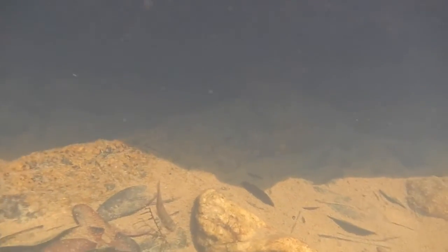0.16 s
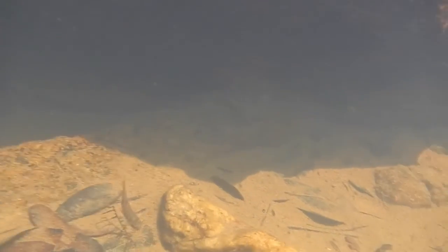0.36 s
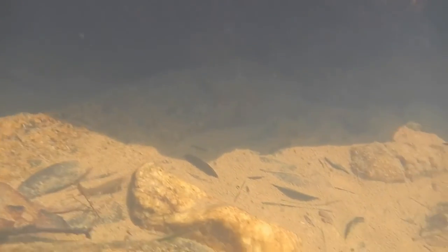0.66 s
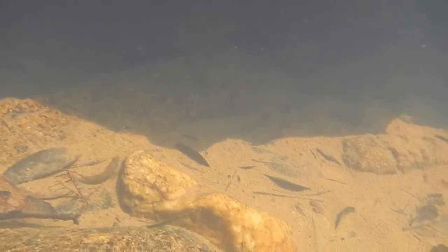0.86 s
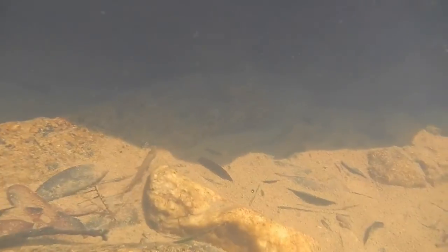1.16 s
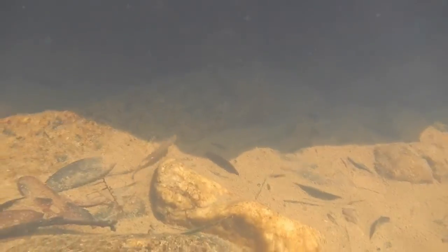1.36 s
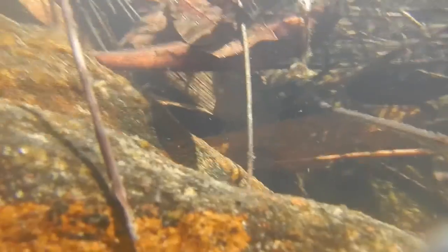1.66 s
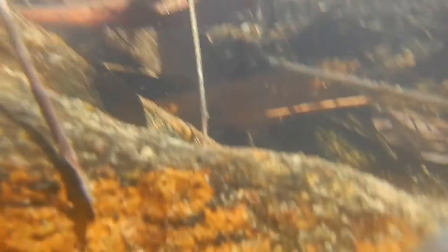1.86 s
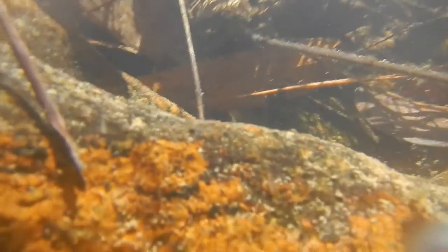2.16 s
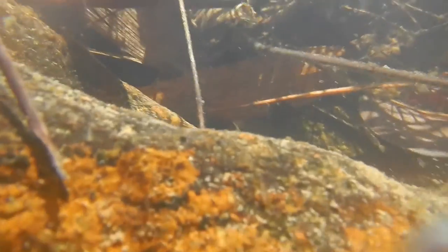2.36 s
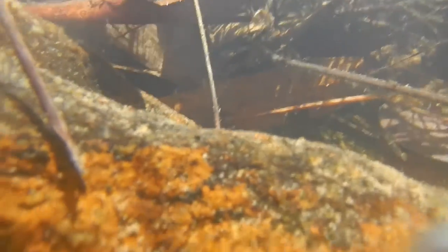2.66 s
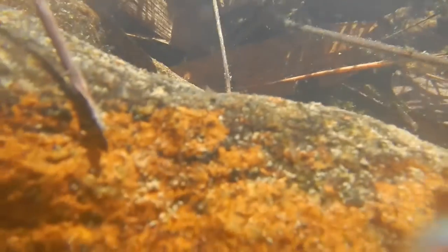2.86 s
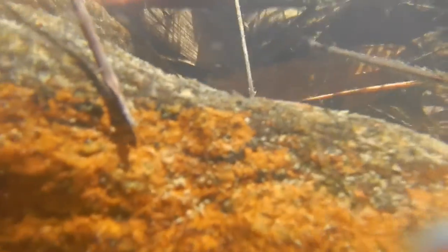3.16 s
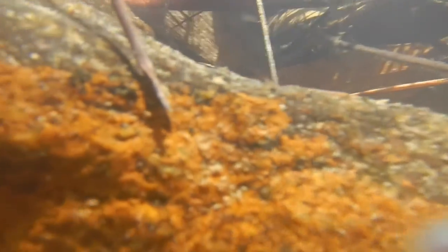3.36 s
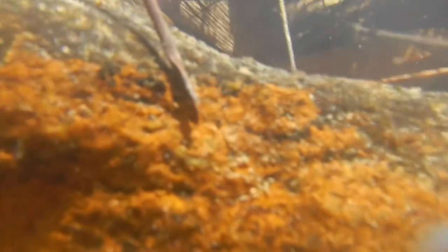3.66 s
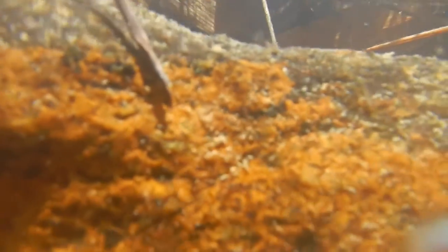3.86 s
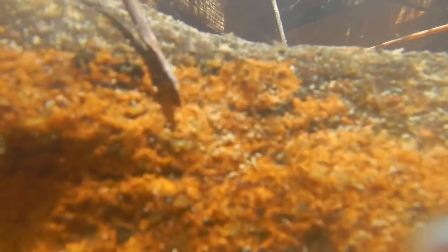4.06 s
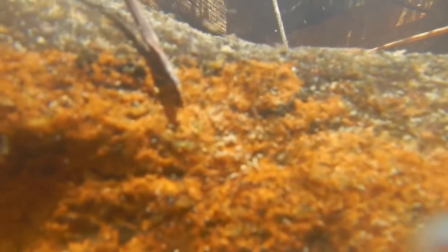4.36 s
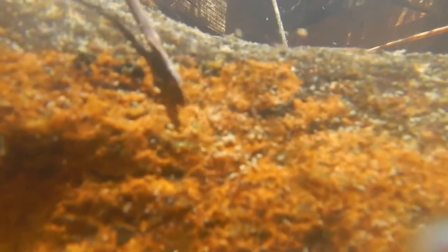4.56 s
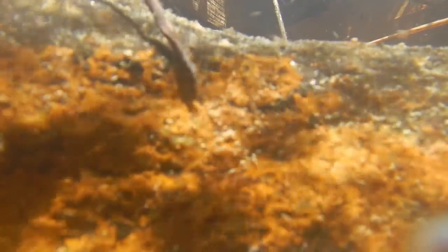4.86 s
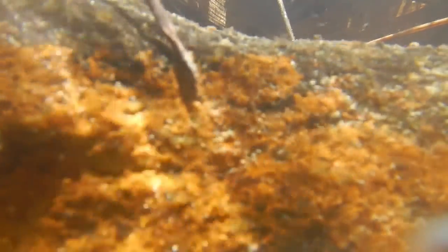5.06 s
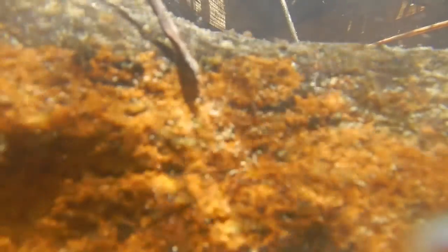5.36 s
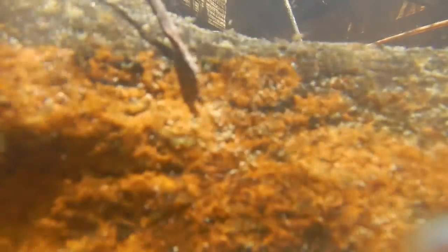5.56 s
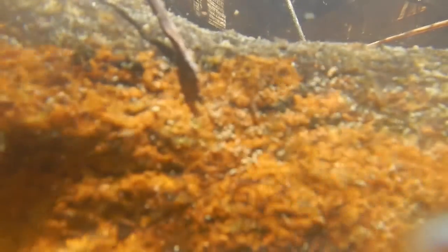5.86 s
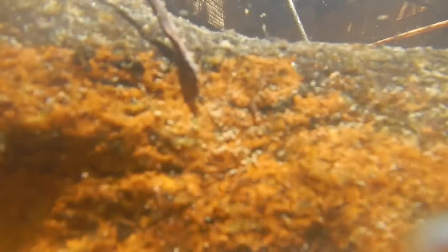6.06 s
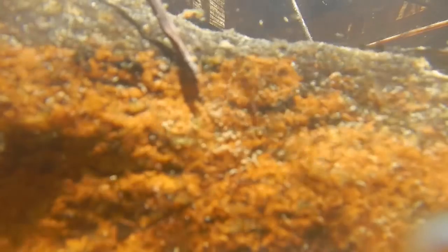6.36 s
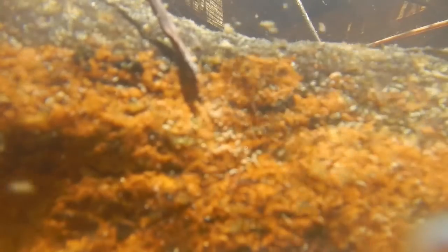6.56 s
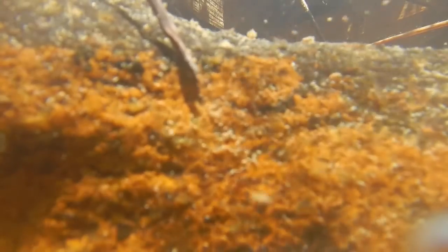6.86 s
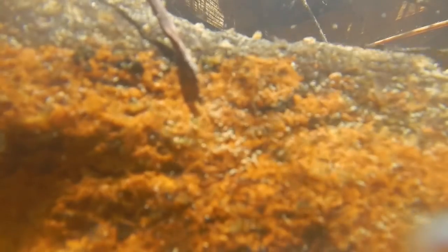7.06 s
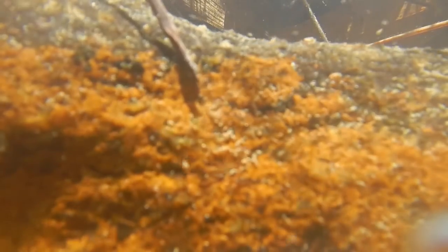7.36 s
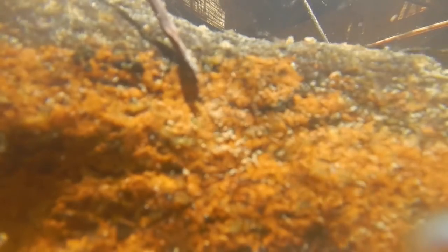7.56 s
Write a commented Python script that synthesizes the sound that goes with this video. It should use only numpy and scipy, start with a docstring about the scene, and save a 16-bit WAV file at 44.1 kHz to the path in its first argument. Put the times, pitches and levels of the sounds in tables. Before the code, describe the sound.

A small sealed microphone sits underwater in a stony stream. From 0 to 1.7 s, muffled water gurgles with low eddies, a thin wash and irregular hollow bumps, strongest near 0.15, 1.2, 1.4 and 1.6 s; faint, short high pips hide beneath. At about 1.7 s everything cuts out for less than a tenth of a second. Then rounded gulps and thumps crowd in until about 2.1 s, continue more loosely, and cluster again from 2.6 to 2.9 s, with dull scratches. The flow dips after the heavy bumps and recovers. At 3.9 to 4.0 s one hard, hollow, rattling knock on stone overloads the sound. The water drops nearly away, then gradually returns over two seconds as muffled, steady bubbling flow with faint hiss and a very thin high whine. A few weak bumps and, after 5.7 s, tiny bubble snaps remain until 7.7 s.

```python
"""Stony-stream water churns and gurgles around a small sealed camera: coloured noise plus ringing air pockets.
Bumps (gliding tones in low noise) and one rattling knock on a stone (case modes, thud) overload it. Flow,
knocks and electronics sag at listed times, then creep back; a muffled steady flow returns last. The flow
changes colour at a short silent dropout and again at the knock. Scratches, snapping tiny bubbles, faint hiss
and a thin whine lie on top."""
import sys
import numpy as np
from scipy import signal
from scipy.io import wavfile
from scipy.ndimage import uniform_filter1d

SR = 44100
rng = np.random.default_rng(int(sys.argv[2]) if len(sys.argv) > 2 else 0)


def persist_wave(psi):
    """Save psi, clipped to +-1, as 16-bit WAV."""
    counts = np.round(np.clip(psi, -1, 1) * 32767).astype(np.int16)
    wavfile.write(sys.argv[1], SR, np.atleast_2d(counts).T)


def boost_factor(decibels):
    """Convert a level in decibels to a linear amplitude factor."""
    exponent = np.asarray(decibels, float) / 20
    return 10 ** exponent


N = 340011


def evened(x):
    """Scales to rms 1."""
    return x / np.sqrt(np.mean(x ** 2) + 1e-20)


def read(points, hz):
    """Reads a spectrum on a log-frequency axis."""
    f, value = np.transpose(points)
    return np.interp(np.log(hz + 1), np.log(f + 1), value)


def curve(rows, column):
    """One column of a time table, interpolated to every sample."""
    rows = np.array(rows)
    return np.interp(np.arange(N) / SR, rows[:, 0], rows[:, column])


def add(mix, s, sound, pan_db):
    """Adds a sound at time s; pan_db is left minus right."""
    part = mix[:, round(s * SR):][:, :sound.shape[-1]]
    gains = boost_factor(np.array([[pan_db / 2], [-pan_db / 2]]))
    part += gains * sound[..., :part.shape[1]]


def ring(hz, t60_s, rise_s):
    """A sine with exponential decay and soft start, cut at 0.25 s."""
    t = np.arange(round(.25 * SR)) / SR
    decay = boost_factor(-60 * t / max(t60_s, .004))
    return np.sin(2 * np.pi * hz * t) * decay * (1 - np.exp(-t / rise_s))


# flow colour changes: t/s
CHANGES_S = (1.75, 3.95)
# left-right likeness of noise: f/Hz, likeness/1
LIKENESS = [(30, .1), (130, 0.43), (290, 0.77), (640, 0.74), (1400, 0.2), (3100, 0.7), (6800, .3),
            (15000, .3)]
# phase by which left leads: f/Hz, lead/rad
LEFT_LEAD = [(30, -0.5), (430, 0.25), (900, 0.47), (1500, 1.34), (2240, 2), (3400, 4.5), (13600, 4.5),
             (14600, 0)]
# noise balance: f/Hz, left minus right/dB
BALANCE = [(60, -5.5), (180, 1), (550, -9), (1650, 2), (4970, 2), (15000, -2.5)]


def noise(spectra, size, patchy_db, flicker_db):
    """Two partly alike noise channels, one colour a stretch, in drifting patches and shared flicker."""
    hop = size // 4
    frames, hz = 4 * N // size + 5, np.fft.rfftfreq(size, 1 / SR)
    a, b, c, d, patches = rng.standard_normal((frames, len(hz), 5)).T
    patches = uniform_filter1d(patches, size=4, axis=0)  # along frequency
    patches = evened(uniform_filter1d(patches, size=5, axis=1))  # along time
    flicker = evened(uniform_filter1d(rng.standard_normal(frames), size=3))

    same = np.clip(read(LIKENESS, hz), -1, 1)[:, None]
    left = a + 1j * b
    right = same * left + np.sqrt(1 - same ** 2) * (c + 1j * d)
    right = right * np.exp(-1j * read(LEFT_LEAD, hz))[:, None]

    spot = np.searchsorted(CHANGES_S, np.arange(frames) * hop / SR) % len(spectra)
    colours = np.transpose([evened(boost_factor(read(spectrum, hz))) for spectrum in spectra])
    lean_db = read(BALANCE, hz)[:, None] / 2
    level_db = patchy_db * patches + flicker_db * flicker + np.array([lean_db, -lean_db])
    z = np.array([left, right]) * colours[:, spot] * boost_factor(level_db)
    return evened(signal.istft(z, nperseg=size, noverlap=size - hop)[1][:, :N])


def bubbles(spectrum, per_s, spread_db, cycles, shared, top_hz):
    """Random air pockets at 16 pitches ring, losing 20 dB in the given cycles unless t60 is floored."""
    out = np.zeros((2, N))
    for k, hz in enumerate(np.geomspace(top_hz / 4.01, top_hz, num=16)):
        draw = rng.random((N, 2))
        strength_db = spread_db * np.minimum(-np.log(draw[:, 1] + 1e-9), 4)
        train = (draw[:, 0] < per_s / 16 / SR) * boost_factor(strength_db)
        pocket = ring(hz, 3 * cycles / hz, 1 / hz)[:4000]
        out[k % 2] += boost_factor(read(spectrum, hz)) * signal.oaconvolve(train, pocket)[:N]
    return evened(out + shared * out[::-1])  # other side hears a share


# flow colour, first and last stretch: f/Hz, relative density/dB
FLOW = [
    [(88, -49), (150, 3.5), (205, -33), (276, -10), (328, 6), (371, 15), (614, 4.5), (676, 19),
     (1200, -8.5), (1560, -34.5), (2640, -120)],
    [(88, -33.5), (150, -9), (306, -24), (412, -1), (498, -12.5), (593, 0.5), (625, 6.5), (1100, -24),
     (1200, -26), (1560, -53.5), (2640, -120)],
]
# flow colour between the changes: f/Hz, relative density/dB
RESTLESS_FLOW = [(88, -36), (150, -12), (231, -6.5), (367, -2.5), (441, -1.5), (728, 0.5), (900, -28),
                 (1050, -25), (1500, -36), (1950, -59), (3300, -120)]


def gurgle():
    """Turbulent flow as coloured noise plus many ringing air pockets; rms 1."""
    flow = noise([FLOW[0], RESTLESS_FLOW, FLOW[1]], size=1024, patchy_db=1.5, flicker_db=2.0)
    pockets = bubbles(FLOW[1], per_s=700, spread_db=1.4, cycles=5.46, shared=0.36, top_hz=964.8)
    return evened(flow + 0.78 * pockets)


# water jostling the case: t/s, thumps before low-pass re gurgle/dB
JOSTLE = [(0, -13.5), (1.7, -3), (1.8, -4), (2.9, -1.5), (3.4, 0.5), (3.9, -9.5), (4.3, -1.5), (5.5, -8.5),
          (6, -23.5), (7.71, -12)]


def thumps():
    """Water jostles the case: short-ringing pulses, low-passed to blunt thumps."""
    pulses = bubbles([(100, 0), (600, -1), (900, -8)], per_s=200, spread_db=3.6, cycles=1.4,
                     shared=.45, top_hz=850)
    low_pass = signal.butter(4, 950, fs=SR, output="sos")
    return boost_factor(curve(JOSTLE, 1)) * signal.sosfilt(low_pass, pulses)


# eddy colour: f/Hz, relative density/dB
RUMBLE = [(12, -40.5), (20, -12), (64, 6), (184, -2), (275, -3.5), (327, -8.5), (400, -13), (520, -37),
          (880, -120)]


def eddies():
    """Lumpy low eddies as slowly patchy low noise; rms 1."""
    return noise([RUMBLE], size=2048, patchy_db=3, flicker_db=1.0)


# wash colour, first and last stretch: f/Hz, relative density/dB
UPPER = [
    [(530, -41.5), (900, 2), (1040, -13.5), (1360, -2.5), (1500, -14.5), (1990, -16.5), (2340, -31),
     (2540, -22.5), (2640, -31), (4500, -43.5), (5850, -68), (9900, -120)],
    [(530, -41.5), (900, 6.5), (1110, -7.5), (1220, 6), (1330, -8), (1480, -3.5), (1600, -9), (1810, 1),
     (1970, -8), (2250, -16.5), (2760, -18), (3050, -22), (5000, -40), (6500, -61), (11000, -120)],
]
# wash colour between the changes: f/Hz, relative density/dB
RESTLESS_UPPER = [(530, -31.5), (900, -7), (1050, -4.5), (1100, -1.5), (1310, -8), (2370, -23), (2570, -25),
                  (2960, -33.5), (5000, -45.5), (6500, -79), (11000, -120)]


def wash():
    """Thin upper wash as patchy noise; rms 1."""
    return noise([UPPER[0], RESTLESS_UPPER, UPPER[1]], size=512, patchy_db=2.5, flicker_db=-0.5)


# faint short tones: t/s, length/s
PIPS = [(.093, 0.026), (.138, 0.063), (.238, 0.037), (.38, .025), (.48, .05), (.535, 0.049), (.655, 0.026),
        (.685, 0.02), (0.792, 0.042), (.835, 0.033), (.885, 0.036), (.965, 0.035), (1.203, 0.047),
        (1.275, .042), (1.455, 0.043), (2.13, 0.027), (2.253, 0.024), (2.319, 0.033), (2.69, 0.045),
        (3.17, .025), (3.293, .04), (3.36, .025), (3.577, 0.023)]
PIP_HZ, PIP_UNDER_FLOW_DB = 2500, 30.5  # tone peak under gurgle rms


def pips():
    """Faint steady sines a few hundredths of a second long, with tapered ends."""
    out = np.zeros((2, N))
    for s, length_s in PIPS:
        t = np.arange(round(length_s * SR)) / SR
        add(out, s, np.sin(2 * np.pi * PIP_HZ * t) * signal.windows.tukey(len(t), .4), 0)
    return boost_factor(-PIP_UNDER_FLOW_DB) * out


# stir before the sag: t/s, flow level/dB, eddies re flow/dB, upper wash re flow/dB
STIR = [(0, -22, 4, -13), (.35, -22, -5, -12.5), (.9, -27.5, -4, -9.5), (1.15, -25, 0, -13.5),
        (1.38, -27.5, -1.5, -9), (1.5, -21.5, -1.5, -12), (1.71, -24.5, 4.5, -9.5),
        (1.8, -15, -16.5, -13.5), (1.92, -9, -22, -18), (2.08, -15, -0.5, -18), (2.2, -13, -1.5, -18),
        (2.45, -18, -10.5, -18), (2.7, -13.5, -10, -16.5), (2.8, -22.5, -13, -13.5),
        (2.83, -10.5, -21.5, -13.5), (2.95, -9.5, -10, -20), (3.0, -17, -17, -17), (3.09, -11.5, -25, -11),
        (3.26, -22.5, -9, -15), (3.39, -15, -14, -15), (3.43, -12.5, -16, -7), (3.55, -13.5, -15, -15),
        (3.77, -16, -9, -14.5), (3.89, -11, -24.5, -17.5), (4.05, -12.5, -3.5, -16), (4.3, -22, -7, -19.5),
        (4.7, -22, -11, -16.5), (4.8, -24, -16, -13), (5.0, -22.5, -21, -14.5), (5.3, -24, -16, -14),
        (5.6, -23.5, -16, -14.5), (6.3, -26, -23.5, -13.5), (6.6, -28, -27.5, -12), (7.1, -27, -23, -14.5),
        (7.71, -30.5, -18.5, -7)]


def water():
    """Gurgle, thumps, eddies, wash and pips all follow one stir level."""
    low = boost_factor(curve(STIR, 2)) * eddies()
    high = boost_factor(curve(STIR, 3)) * wash()
    return boost_factor(curve(STIR, 1)) * (gurgle() + thumps() + low + high + pips())


def tick(db, edge_db):
    """A few-ms scratch: decaying noise, dull body peaking at db plus bright edge, partly unlike per side."""
    t = np.arange(600) / SR
    both, left, right = rng.standard_normal((3, 600)) * np.exp(-t / 0.0016)
    puff = both + 2.0 * np.array([left, right])
    body = signal.sosfilt(signal.butter(4, [800, 2400], "band", fs=SR, output="sos"), puff)
    edge = signal.sosfilt(signal.butter(2, [2400, 4500], "band", fs=SR, output="sos"), puff)
    return boost_factor(db) * (body / abs(body).max() + boost_factor(edge_db) * edge / abs(edge).max())


# gulps of air and bumps at the case: t/s, level/dB, f at crest/Hz, rise/s, left minus right/dB
GULPS = [(.02, -20, 930, 0.0016, -11.5), (.157, -6, 637, .003, -2), (.171, -9.5, 476, 0.0034, -14),
         (0.198, -14, 695, 0.004, 0), (.277, -18.5, 713, 0.0057, -3), (0.337, -18, 273, 0.0012, -5),
         (.411, -19.5, 683, 0.0027, -5), (.429, -17, 585, 0.0031, 0.5), (0.513, -28, 307, 0.0019, -6),
         (0.545, -11.5, 295, 0.0019, 0), (.917, -15.5, 670, 0.0044, -10), (.934, -12, 270, 0.0021, -5),
         (1.044, -18.5, 534, 0.0029, -19), (1.079, -15, 562, 0.0051, -11), (1.107, -13, 250, 0.0022, -11),
         (1.186, -12, 446, 0.0029, 8), (1.193, -5, 672, 0.0045, -5), (1.393, 0, 602, 0.0019, 7),
         (1.407, -9.5, 537, 0.0059, -5), (1.441, -14.5, 640, 0.0026, -9), (1.54, -16, 493, 0.0033, -12),
         (1.585, -1, 818, .002, -8), (1.812, -5.5, 179, 0.0015, -2.5), (1.816, -4.5, 605, 0.0027, -1.5),
         (1.847, -15.5, 572, 0.0034, -10.5), (1.856, -6, 546, 0.0057, -10.5), (1.863, -9, 602, 0.0047, 3),
         (1.876, -17.5, 527, 0.0045, -10), (1.895, -7.5, 517, 0.0013, -9), (1.913, -18.5, 570, .0036, 1),
         (1.956, -17.5, 490, 0.0016, -5), (1.976, -10, 601, 0.0043, -6), (2.118, -13.5, 662, 0.0019, 3.5),
         (2.164, -17, 449, 0.0044, -5.5), (2.193, -14.5, 277, .0042, 2), (2.242, -18, 635, 0.0039, -9),
         (2.334, -10.5, 663, 0.004, 5), (2.346, -10, 650, 0.0028, 5.5), (2.478, -9, 270, 0.0028, -1.5),
         (2.586, -2, 361, 0.0024, -1.5), (2.613, -8.5, 416, 0.0044, 6), (2.659, -25.5, 401, 0.013, 10),
         (2.702, -28.5, 315, 0.0027, 12), (2.717, -5.5, 384, 0.0051, -0.5),
         (2.822, -15.5, 507, 0.0036, 4.5), (2.845, -4, 588, 0.0025, -3.5), (2.869, -15, 770, 0.0051, -5.5),
         (2.888, -4, 494, 0.0007, -2), (2.894, -3, 253, 0.0036, 1.5), (2.923, -14.5, 239, 0.0032, -1),
         (2.969, -21.5, 477, 0.0037, -9.5), (3.077, -38.5, 580, 0.0056, 7), (3.177, -27.5, 392, 0.0023, 5),
         (4.044, -27.5, 656, 0.0048, -7), (4.064, -27.5, 482, 0.0019, -2), (4.11, -33, 700, 0.0042, -9),
         (4.133, -29, 562, 0.0018, -3.5), (4.546, -32.5, 562, 0.0025, -8.5),
         (5.413, -29.5, 730, 0.0023, -11), (5.485, -18, 238, 0.0037, 0), (5.504, -29.5, 121, 0.0072, -1),
         (5.86, -26.5, 109, 0.0081, 1), (6.394, -24, 585, .0027, 4), (6.861, -19, 664, 0.0037, 6)]
GULP_TICK_DB, GULP_EDGE_DB = -38, -33  # scratch re gulp level; edge re scratch body


def bumps():
    """A gulp or bump swells and dies: a falling pitch in a blunt puff of low noise, plus a scratch."""
    out, t = np.zeros((2, N)), np.arange(round(.1 * SR)) / SR
    band = signal.butter(5, [160, 850], "band", fs=SR, output="sos")
    for s, db, hz, rise_s, pan_db in GULPS:
        swell = t / max(rise_s, .001) * np.exp(1 - t / max(rise_s, .001))
        glide_hz = hz * (1 + 0.18 * (np.exp(-t / rise_s) - np.exp(-1)))
        phase = .8 * rng.uniform(-1, 1, (2, 1))
        tone = np.sin(2 * np.pi * np.cumsum(glide_hz) / SR + phase)
        both, left, right = rng.standard_normal((3, 2 * len(t)))
        puff = signal.sosfilt(band, both + 0.95 * np.array([left, right]))
        puff = evened(puff[:, len(t):])  # skips filter start-up
        add(out, s, boost_factor(db) * swell * (.6 * tone + .3 * puff), pan_db)
        add(out, s + 0.0018, tick(db + GULP_TICK_DB, GULP_EDGE_DB), pan_db)
    return out


# case strikes a stone and rattles, before the sag: t/s, case ring/dB, thud/dB, left minus right/dB
KNOCKS = [(3.9063, 29.5, -20, -4), (3.9122, 25.5, 21.5, 13), (3.917, 9, 33, 4), (3.922, 27, 24, -5.5),
          (3.987, 27.5, 31, -6.5), (3.999, 25, 4, -4.5), (4.009, 19, 30.5, 4.5), (4.025, -3, 9, 16)]
# low thud: f/Hz, t60/s
THUD = (228, 0.055)
# case modes: f/Hz, level re case ring/dB, t60/s, sign at right port/1
CASE = [(472.2, -8.5, 0.34, 1), (491, 0.5, 0.02, 1), (591.5, -1.5, 0.049, 1), (680, -26.5, 0.39, 1),
        (860, -13, 0.011, 1), (1180, -30.5, 0.083, -1), (1260, -24.5, 0.075, 1), (1510, -20, 0.036, -1),
        (2850, -31.5, 0.012, -1)]
KNOCK_TICK_DB, KNOCK_EDGE_DB = -30, -6.5  # scratch re case ring; edge re scratch body


def knocks():
    """Every blow rings the case modes and a low thud, with a scratch at its start."""
    out = np.zeros((2, N))
    shell = np.zeros((2, 1))
    for hz, mode_db, t60_s, sign in CASE:
        sides = np.array([[1], [np.sign(sign)]])
        shell = shell + boost_factor(mode_db) * sides * ring(hz, t60_s, 0.00095)
    thud = ring(*THUD, 0.00078)
    for s, db, thud_db, pan_db in KNOCKS:
        add(out, s, boost_factor(db) * shell + boost_factor(thud_db) * thud, pan_db)
        add(out, s, tick(db + KNOCK_TICK_DB, KNOCK_EDGE_DB), pan_db)
    return out


# scratches on the case, from grit and (near 4.01 s) from the knock: t/s, body peak/dB, bright edge re body/dB,
# left minus right/dB
TICKS = [(0.0226, -36, -53, 1), (0.9083, -49, -31.5, -2.5), (1.3945, -20.5, -26, -4.0),
         (1.5872, -36, -36, 2), (1.5895, -26.5, -15, -10), (1.819, -27.5, -8.5, -7.5),
         (1.8577, -26.5, -15.5, -10), (1.8933, -37.5, -34, 13), (2.208, -42, -33, 6),
         (2.3376, -46, -40, 17), (2.4783, -40, -40, 8), (2.6612, -36.5, -39, 9), (2.72, -28.5, -38, 6),
         (2.8506, -27, -38, 9), (2.8902, -21.5, -6.5, 2), (2.8955, -23, -5, -2), (3.0793, -47, -35, 8.5),
         (3.0976, -53, -42, 14), (3.1794, -58, -42, 10.0), (3.4246, -43, -31, 15), (3.486, -45, -34, 11),
         (3.7773, -45, -43, 1.5), (4.008, -42, -22, 5), (4.0259, -44, -9, 1.5), (4.115, -51.5, -31.5, 6),
         (4.5466, -63.5, -29.5, -0.5), (4.8794, -36.5, -36, 7), (5.4141, -46.5, -30, 1)]


def scratches():
    """Scratches on the case, from grit and from the knock: single short noise bursts."""
    out = np.zeros((2, N))
    for s, db, edge_db, pan_db in TICKS:
        add(out, s, tick(db, edge_db), pan_db)
    return out


# tiny bubbles snap: t/s, level/dB, f/Hz, left minus right/dB
FIZZ = [(5.694, -50, 3270, 12), (5.9, -48, 3930, 1), (5.9444, -47, 3260, 3), (6.579, -43, 3050, -6),
        (6.7935, -49, 3030, 5), (6.8994, -56, 3130, -6), (6.9641, -38, 3100, -7), (7.0429, -43, 4050, -2),
        (7.3627, -41, 3010, -1.5), (7.4794, -56, 3360, 1.0)]


def fizz():
    """Each tiny bubble snaps as a sine dying within milliseconds."""
    out = np.zeros((2, N))
    for s, db, hz, pan_db in FIZZ:
        add(out, s, boost_factor(db) * ring(hz, t60_s=0.0092, rise_s=0.00045), pan_db)
    return out


# hiss colour: f/Hz, relative density/dB
HISS = [(1760, -38.5), (3000, -3), (5660, -7), (13300, -11.5), (14100, -18), (14400, -14), (15400, -3.5),
        (15900, -48.5)]
WHINE_HZ, WHINE_DB, HISS_OVER_WHINE_DB = 14834.5, -67, 4.5  # rms levels before the sag


def electronics():
    """Electronics: a thin high sine whine and broad noise hiss."""
    whine = np.sqrt(2) * np.sin(2 * np.pi * WHINE_HZ * np.arange(N) / SR)
    hiss = boost_factor(HISS_OVER_WHINE_DB) * noise([HISS], size=512, patchy_db=-0.4, flicker_db=1.14)
    return boost_factor(WHINE_DB) * (whine + hiss)


# level drops: t/s, depth below full level/dB
SAGS = [(0, 17), (1.4, 13), (1.593, 13), (1.87, 23), (1.983, 22), (2.903, 37.5), (3.619, 29.5), (3.918, 36),
        (3.996, 42.5), (4.03, 43.5)]
CREEP_DB_PER_S, DROP_S = 18.5, 0.0077


def sag():
    """Gain that drops at listed times and creeps back; the deepest drop still recovering rules."""
    t = np.arange(N) / SR
    drops_db = [np.where(t >= s, db - CREEP_DB_PER_S * (t - s), 0) for s, db in SAGS]
    below_db = np.maximum(np.max(drops_db, axis=0), 0)
    return boost_factor(-uniform_filter1d(below_db, round(DROP_S * SR)))


def scene():
    """All sounds at the case; bumps, scratches and fizz do not sag."""
    return sag() * (water() + knocks() + electronics()) + bumps() + scratches() + fizz()


def band_limit(x):
    """A steep low-pass at the top of the band."""
    return signal.sosfilt(signal.butter(12, 16290, fs=SR, output="sos"), x)


# dropout: start/s, end/s
DROPOUT_S = (1.712, 1.797)


def record(dry):
    """Overload flattens the loudest tops; the dropout is silenced."""
    t = np.arange(N) / SR
    running = (t < DROPOUT_S[0]) | (t >= DROPOUT_S[1])
    mix = np.clip(dry, -.93, .93) * running
    return band_limit(mix)


dry = scene()
out = record(dry)
persist_wave(out)
```